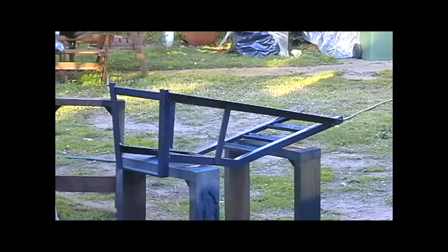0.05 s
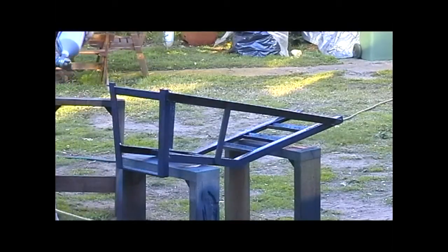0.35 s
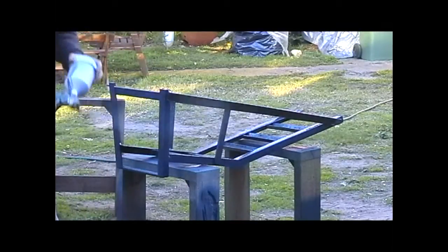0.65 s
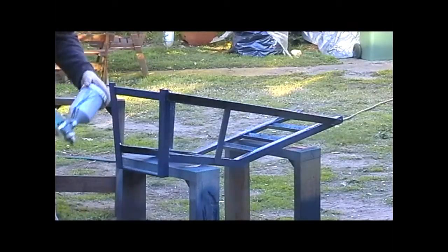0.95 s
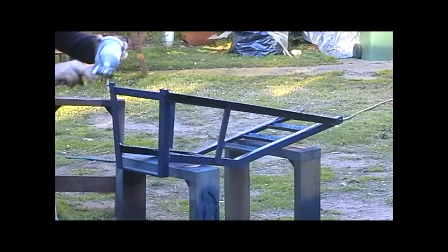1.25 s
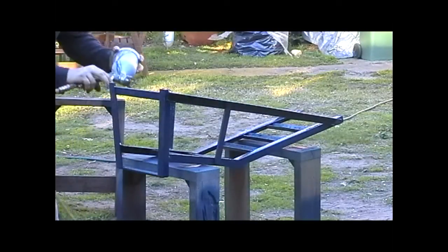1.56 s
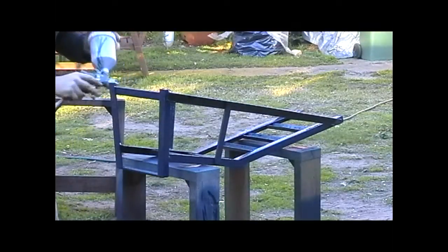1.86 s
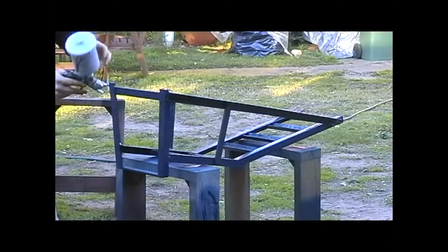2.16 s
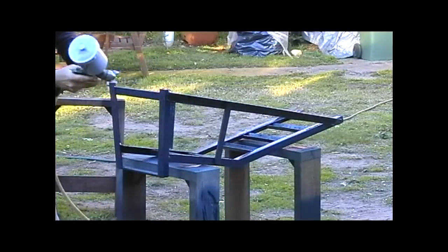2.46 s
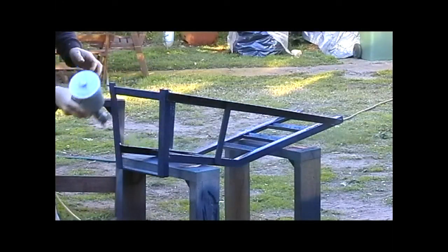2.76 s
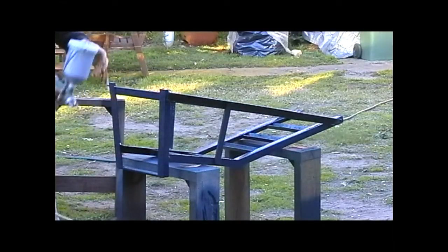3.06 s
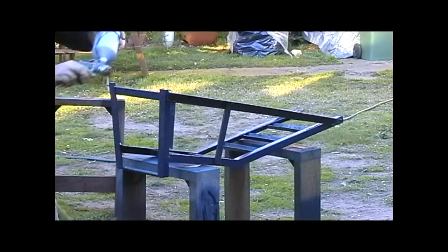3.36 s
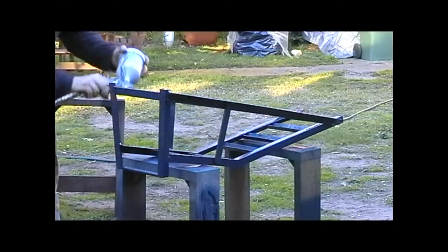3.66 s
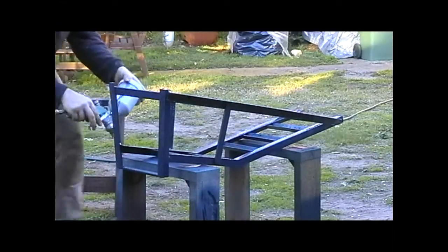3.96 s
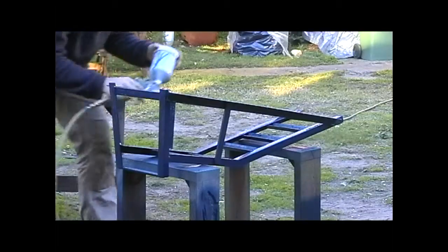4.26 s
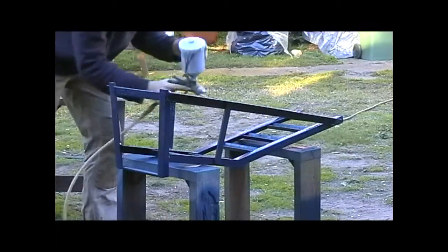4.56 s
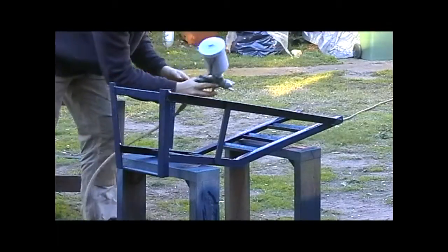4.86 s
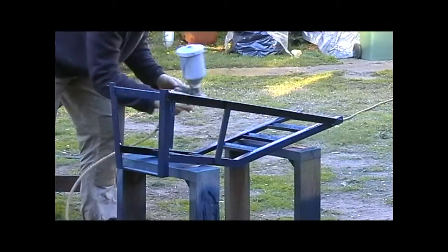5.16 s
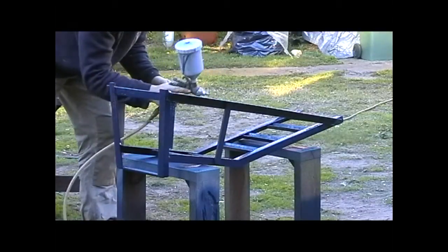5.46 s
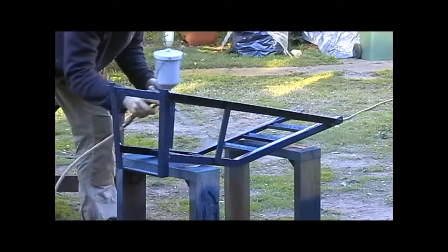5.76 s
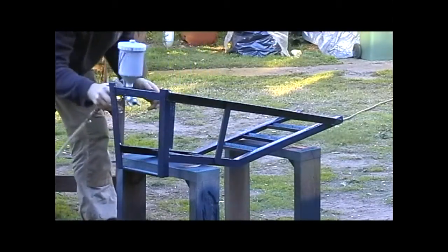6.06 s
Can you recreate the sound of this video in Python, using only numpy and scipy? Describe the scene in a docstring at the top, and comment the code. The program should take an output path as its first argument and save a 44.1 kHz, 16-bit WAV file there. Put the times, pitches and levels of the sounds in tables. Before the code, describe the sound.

A piston air compressor runs steadily outdoors, with a throbbing pitched hum and a fast, hissy metallic clatter.

```python
"""A belt-driven piston air compressor runs steadily in a garden, off to one side.
At the start a faint, distant drone sounds under it and dies away within two seconds.
Throughout, each crank turn swells the intake turbulence, flutters the reed valve, then sends a
pressure pulse through intake and tank (a throbbing hum). Air rushes; knocks and valve ring the fins,
pipe and guard. This clatter swells with every lap of the belt, to the end."""
import sys
import numpy as np
from scipy import signal
from scipy.fft import rfft, irfft
from scipy.io import wavfile

SR = 44100
rng = np.random.default_rng(int(sys.argv[2]) if len(sys.argv) > 2 else 0)


def wrap_up_sound(samples):
    """Save the sound to the file named by the first command line argument, as 16-bit audio."""
    columns = np.atleast_2d(samples).T
    # keep every value between -1 and 1, then stretch to whole-number steps
    tamed = np.clip(columns, -1, 1)
    steps = np.round(tamed * 32767).astype(np.int16)
    wavfile.write(sys.argv[1], SR, steps)


N = 273420
T = np.arange(N) / SR
FREQ = np.arange(N // 2 + 1) * SR / N
CRANK_HZ = 21.0722


def hum(turns, stroke_turn=.8, weak_db=-60.5, waver_db=.71, echo_db=-38, abruptness=.52):
    """One pressure pulse a turn rings intake and tank, and fades until the next."""
    # strong partials (multiple of crank rate [-], level [dB])
    partials = [(3, -64.6), (7, -45.9), (9, -50.1), (10, -53.8), (11, -40.0), (12, -38.3), (14, -38.7),
                (15, -30.8), (17, -35.1), (18, -42.2), (19, -45.1), (20, -41.2), (21, -41.7), (22, -43.2),
                (23, -41.4), (24, -39.1), (25, -27.7), (26, -24.8), (27, -24.3), (28, -28.0), (29, -45.3),
                (31, -40.1), (32, -41.1), (34, -37.0), (35, -31.0), (36, -41.7), (38, -42.2), (39, -47.9),
                (40, -36.5), (41, -46.1), (42, -45.4), (43, -42.3), (44, -45.8), (50, -44.8), (51, -45),
                (54, -49.2), (57, -50.1), (84, -46), (85, -46)]
    order, level_db = np.transpose(partials)
    size = 2048  # samples per turn
    k = np.arange(size // 2 + 1)
    gain = undb(weak_db) * k ** 2 / (k ** 2 + 120) / (1 + (k / 90) ** 4)  # weak partials in between
    gain[np.round(order).astype(int)] = undb(level_db)
    # cepstrum: phase of a sharp blow; abruptness < 1 rounds the attack
    cepstrum = irfft(np.log(gain + .003))
    phase = 2 * abruptness * rfft(cepstrum[:size // 2], size).imag
    # early above the main resonance, late below: each chuff sinks in pitch
    lead_turns = .11 * np.tanh((k - np.argmax(gain)) / 2)
    phase += 2 * np.pi * np.cumsum(lead_turns)
    # yard echoes spread weak partials over the turn
    spread_rad = np.minimum((undb(echo_db) / (gain + 1e-9)) ** 2, np.pi)
    phase += spread_rad * rng.standard_normal(len(k))
    cycle = irfft(gain * np.exp(1j * phase)) * size / np.sqrt(2)
    wave = np.interp(turns - stroke_turn, np.arange(size) / size, cycle, period=1)
    return wave * undb(waver_db * walk(20))


def intake(turns, swing_db=1, peak_turn=.46):
    """Turbulence swells once a turn as air is drawn in."""
    # turbulence spectrum (frequency [Hz], density [dB per Hz])
    turbulence = [(25, -84), (60, -91), (120, -72.5), (220, -72.5), (320, -66), (440, -60), (560, -52.5),
                  (660, -61), (740, -53.5), (900, -58.5), (1200, -64), (1800, -76.5), (4000, -105)]
    swell = undb(swing_db * np.cos(2 * np.pi * (turns - peak_turn)))
    return colour(repeat_each_turn(stereo_noise(), share=.4) * swell, turbulence)


def clatter(turns, valve_db=-1.1, grain_db=1, knock_spread_db=2, valve_share=.18):
    """Air rush and loose knocks follow the piston load; knocks and valve ring the metal."""
    # piston load (crank position [turns], level [dB])
    piston_load = [(0, .2), (.13, -.5), (.28, -1.5), (.45, .1), (.6, .1), (.7, .7), (.85, .2)]
    # rush of air and bearings (frequency [Hz], density [dB per Hz])
    rush_spectrum = [(300, -100), (1000, -75.5), (1500, -66.5), (2000, -65), (2700, -67), (3400, -63.5),
                     (4500, -64), (6200, -61.5), (7600, -68), (9500, -69.5), (11200, -70), (12500, -77),
                     (14000, -80)]
    # reed valve click (frequency [Hz], density [dB per Hz])
    click_spectrum = [(500, -115), (2500, -88), (4500, -80), (6000, -67.5), (8000, -67), (10000, -72),
                      (14000, -86)]
    position, load_db = np.transpose(piston_load)
    load = undb(np.interp(turns, position, load_db, period=1))
    rush = repeat_each_turn(stereo_noise(), share=.35) * load
    rush *= unit(undb(grain_db * walk(1000)))
    # loose parts knock at much the same crank positions
    knocks = stereo_noise() * undb(knock_spread_db * walk(370))
    knocks = unit(repeat_each_turn(knocks, share=.38) * load)
    reed = valve(turns)
    air = scatter(colour(rush, rush_spectrum), smear_s=.00075)
    clicks = scatter(undb(valve_db) * colour(reed, click_spectrum), smear_s=.00039)
    return belt_swell() * (air + clicks + metal(knocks + valve_share * reed))


def valve(turns, open_turn=.64, flutter_hz=680, rise_s=.001, fade_s=.0063, tick_s=.0007, spread_db=1):
    """The reed snaps open once a turn and chatters against its stop, softer each time."""
    since_s = (turns - open_turn) % 1 / CRANK_HZ
    stroke = np.floor(turns - open_turn).astype(int) + 2
    force = undb(spread_db * rng.standard_normal(stroke.max() + 1))[stroke]
    envelope = (1 - np.exp(-since_s / rise_s)) * np.exp(-since_s / fade_s)
    ticks = np.exp(-(since_s % (1 / flutter_hz)) / tick_s)
    return unit(force * envelope * ticks * stereo_noise())


def metal(push, gain_db=-49, skirt_hz=250):
    """Fins, pipe and guard ring; successive modes arrive from alternate sides."""
    # metal modes (frequency [Hz], width [Hz], relative level [dB])
    modes = [(1063, 34, -6.5), (1205, 29, -6.5), (1785, 40, -5.5), (1981, 22, -6.5), (3262, 25, -5.0),
             (3585, 34, -10), (3920, 90, -12), (4134, 45, -11.0), (4371, 40, -6.0), (4478, 24, -10.0),
             (4640, 30, -5.0), (4963, 35, -7.5), (5211, 28, -6), (5706, 36, -7.5), (5835, 28, -1.5),
             (6050, 23, -7.5), (6158, 32, -4.0), (6449, 34, -0.5), (6707, 38, -10.0), (6793, 23, -11.0),
             (7127, 30, -6.5), (7245, 49, -5.5), (7850, 130, -10), (8182, 39, -9.5), (9054, 26, -11.0),
             (9356, 40, -9.5), (10712, 41, -13.5), (11767, 44, -15.5), (12532, 35, -12.5)]
    response = np.zeros((2, len(FREQ)), complex)
    for k, (hz, width_hz, level_db) in enumerate(modes):
        mode = undb(level_db) / (1 + 2j * (FREQ - hz) / width_hz)
        skirt = 1 / (1 + ((FREQ - hz) / skirt_hz) ** 2)
        side_rad = (-1) ** k * np.pi / 4 * np.array([[1], [-1]])
        response += mode * skirt * np.exp(1j * side_rad)
    return irfft(rfft(push) * response, N) * undb(gain_db) * np.sqrt(SR / 2)


def belt_swell(belt_hz=5.53, start_lap=.058, swell_db=.6, uneven_db=.47, wander_db=.13, wander_hz=.6):
    """Clatter gain: one swell per belt lap, some laps harder, with a slow wander."""
    lap_db = swell_db * np.cos(2 * np.pi * (belt_hz * T + start_lap))
    return undb(lap_db + uneven_db * walk(2 * belt_hz) + wander_db * walk(wander_hz))


def scatter(x, smear_s):
    """Paths over ground and clutter delay each treble frequency differently left and right."""
    knots_hz = np.arange(0, SR, 250)
    delay_s = [np.interp(FREQ, knots_hz, smear_s * rng.standard_normal(len(knots_hz))) for _ in range(2)]
    treble = (FREQ > 1500) & (FREQ < 10500)
    lag_cycles = np.cumsum(np.array(delay_s) * treble, axis=1) * SR / N
    return irfft(rfft(x) * np.exp(-2j * np.pi * lag_cycles), N)


def drone(hz=101, width_hz=6, start_db=-52, fade_s=1):
    """A faint low drone in the distance dies away."""
    band = np.exp(-((FREQ - hz) / width_hz) ** 2)
    tone = irfft(rfft(rng.standard_normal(N)) * band, N)
    return unit(tone) * undb(start_db) * np.exp(-(T / fade_s) ** 2)


def stereo_noise():
    """White noise, partly shared by left and right."""
    # left-right coherence (frequency [Hz], shared power [0-1])
    coherence = [(30, 0.2), (120, 1), (600, 0.99), (1100, 0.58), (2000, 0.32), (5000, 0.39), (8000, 0.46),
                 (12000, 0.56)]
    shared = over_hz(coherence)
    noise = rfft(rng.standard_normal((3, N)))
    return irfft(np.sqrt(shared) * noise[0] + np.sqrt(1 - shared) * noise[1:], N)


def repeat_each_turn(x, share):
    """Each turn repeats a share of the last, so noise gathers on multiples of the crank rate."""
    comb = np.sqrt(1 - share ** 2) / (1 - share * np.exp(-2j * np.pi * FREQ / CRANK_HZ))
    return irfft(rfft(x) * comb, N)


def walk(rate_hz):
    """Smooth random motion of rms 1, rolling off at rate_hz."""
    return unit(irfft(rfft(rng.standard_normal(N)) * np.exp(-(FREQ / rate_hz) ** 2), N))


def colour(x, points):
    """Give a white signal of rms 1 a spectrum in dB per Hz."""
    return irfft(rfft(x) * undb(over_hz(points)) * np.sqrt(SR / 2), N)


def over_hz(points):
    """Join (Hz, value) points on a log-frequency axis."""
    hz, value = np.transpose(points)
    return np.interp(np.log(FREQ + 1), np.log(hz), value)


def undb(db):
    """Decibels to gain."""
    return 10 ** (np.asarray(db) / 20)


def unit(x):
    """Scale to rms 1."""
    return x / np.sqrt(np.mean(x ** 2))


def scene(right_lag_s=.000113):
    """The compressor, off to one side, over the drone; its induction motor holds near-constant speed."""
    # balance (frequency [Hz], left minus right [dB])
    balance = [(60, 5), (140, -1.5), (600, -2.5), (1100, -3.5), (2500, -3.5), (5000, -4.5), (7500, -3),
               (12000, 1)]
    turns = CRANK_HZ * T + .0008 * walk(4.3) + .00056 * walk(30)
    side = np.array([[.5], [-.5]])
    # the direct path reaches the left first
    direct = rfft(hum(turns) + intake(turns)) * np.exp(2j * np.pi * FREQ * side * right_lag_s)
    compressor = direct + rfft(clatter(turns))
    return irfft(compressor * undb(side * over_hz(balance)), N) + drone()


def record(dry, cutoff_hz=14000):
    """Steep low-pass."""
    return signal.sosfilt(signal.ellip(10, .2, 80, cutoff_hz, fs=SR, output="sos"), dry)


dry = scene()
out = record(dry)
wrap_up_sound(out)
```